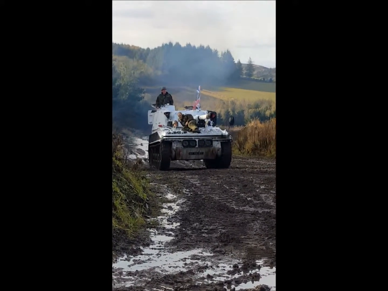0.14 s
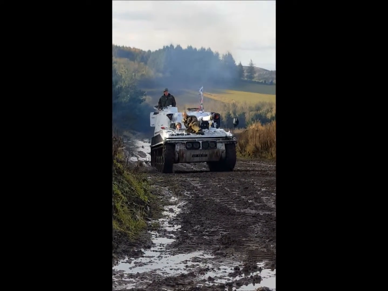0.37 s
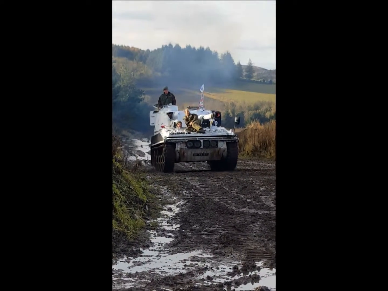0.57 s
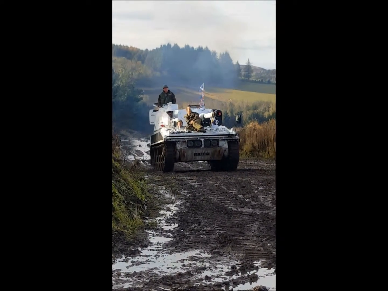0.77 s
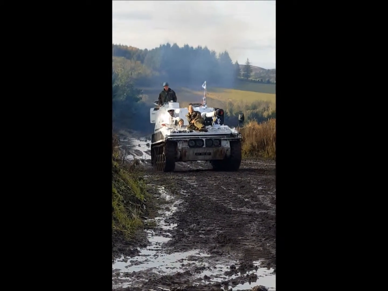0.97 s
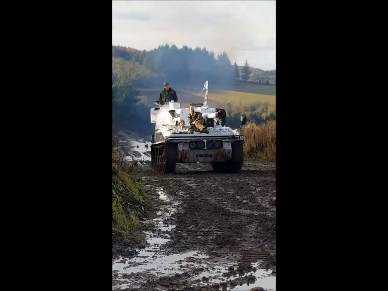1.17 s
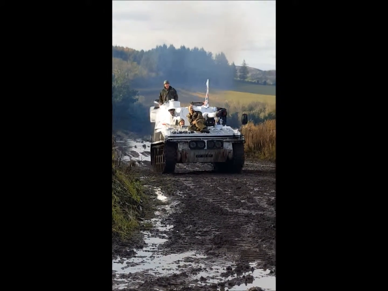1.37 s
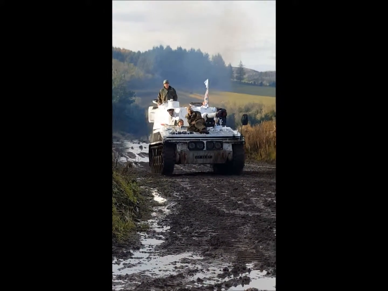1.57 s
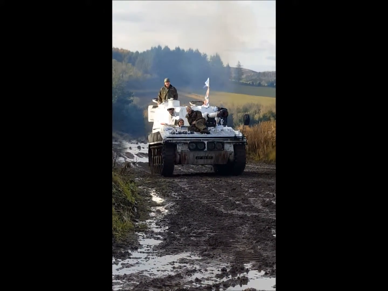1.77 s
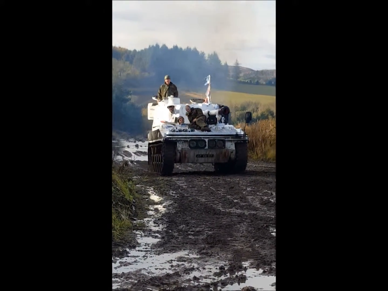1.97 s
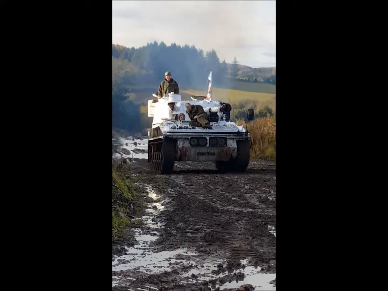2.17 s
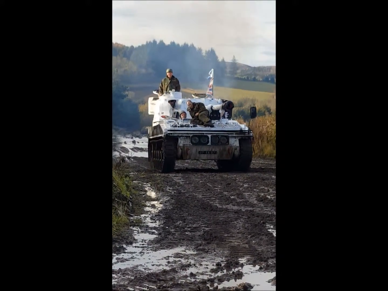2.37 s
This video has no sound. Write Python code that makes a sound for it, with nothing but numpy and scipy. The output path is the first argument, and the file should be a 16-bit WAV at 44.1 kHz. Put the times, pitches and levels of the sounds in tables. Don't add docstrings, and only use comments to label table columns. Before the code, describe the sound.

A heavy tracked vehicle's engine drones and roars steadily closer, its tracks ticking, clanking and squeaking

```python
import sys
import numpy as np
from scipy import signal
from scipy.fft import rfft, irfft, next_fast_len
from scipy.io import wavfile
from scipy.ndimage import uniform_filter1d

SR = 44100
rng = np.random.default_rng(int(sys.argv[2]) if len(sys.argv) > 2 else 0)


def voltage_ratio(level):
    return 10 ** (np.asarray(level, float) / 20)


def to_wav(s):
    ch = np.atleast_2d(s).T
    pcm = np.round(np.clip(ch, -1, 1) * 32767)
    wavfile.write(sys.argv[1], SR, pcm.astype(np.int16))


N = 111573
FAST = next_fast_len(N)
FREQ_HZ = np.maximum(np.fft.rfftfreq(FAST, 1 / SR), 1)
LEFT_RIGHT = np.array([[.5], [-.5]])
CYLINDERS = 6


def level(x, db):
    return x * voltage_ratio(db) / np.sqrt(np.mean(x ** 2))


def curve(table, t, col):
    rows = np.array(table, float)
    return np.interp(t, rows[:, 0], rows[:, col])


def log_curve(table, hz):
    rows = np.array(table, float)
    return np.interp(np.log(hz), np.log(rows[:, 0]), rows[:, 1])


def walk(rate_hz):
    k = max(int(SR / rate_hz) // 32, 1)
    steps = np.repeat(rng.standard_normal(N // 32 // k + 2), k)
    steps = uniform_filter1d(uniform_filter1d(steps, k), k)
    return 1.3 * np.interp(np.arange(N) / 32, np.arange(len(steps)), steps)


def hiss(count):
    return rfft(rng.standard_normal((count, FAST)))


def band(spectrum, hz, width_oct):
    bell = np.exp(-.5 * (np.log2(FREQ_HZ / hz) / width_oct) ** 2)
    return irfft(spectrum * bell, FAST)[..., :N]


# (time [s], firing rate [Hz])
SPEED = [(0, 136.9), (.5, 136.7), (1.0, 136.2), (1.4, 135.75), (1.8, 136.05), (2.1, 136.5), (2.53, 137)]


def engine_cycle(t):
    cycle_start = .3
    return 2 * np.pi * (np.cumsum(curve(SPEED, t, 1)) / SR / CYLINDERS - cycle_start)


# (time [s], firing note [dB], uneven-cylinder throb [dB])
EFFORT = [(0.0, -21.5, -23.5), (0.08, -13, -22), (0.2, -13.5, -21.5), (0.43, -19, -23.5),
          (0.56, -15.5, -20.5), (1.16, -17, -21), (1.21, -18, -19.5), (1.64, -12, -21),
          (1.82, -14.5, -20.5), (2.2, -13, -20), (2.53, -15, -18)]
# (multiple of the cycle rate [1], level [dB])
EXHAUST = [(2, -41.5), (3, -28.5), (4, -32), (5, -51), (6, 0), (7, -24.5), (8, -15.5), (9, -11.5),
           (10, -12), (11, -27.5), (12, -11), (13, -25.5), (14, -23.5), (15, -23), (16, -23), (17, -27.5),
           (18, -27), (19, -33.5), (20, -45), (21, -31.5), (23, -47.5)]
# (time [s], level [dB])
OCTAVE = [(0, 1.5), (.25, -4), (.7, 0), (1.05, 1), (1.35, -2), (1.6, 1), (2.53, -0.5)]


def exhaust(t, cycle):
    dispersion_rad, smear_rad, wander_db = 1.6, .008, .8
    out = 0
    for k, db in EXHAUST:
        wander, slip = walk(7.04), walk(12)
        if k == CYLINDERS:
            gain_db = curve(EFFORT, t, 1) + .3 * wander
        else:
            throb_db = (curve(EFFORT, t, 2) + 20) * min(k / 9, 1.5) - 14
            gain_db = throb_db + db + wander_db * wander * min((k / 10) ** 2, 3)
        if k == 2 * CYLINDERS:
            gain_db = gain_db + curve(OCTAVE, t, 1)
        phase = k * cycle - dispersion_rad * k * k / 2 + smear_rad * k * k / 6 * slip
        out = out - np.sqrt(2) * voltage_ratio(gain_db) * np.sin(phase)
    return out


MESH = [27, 34, 45, 52, 60, 70, 75, 82, 150, 164.3, 249.5, 301]
# (level [dB], smear [rad], flutter [dB])
WHINES = [(-48, .4, 2), (-46, .5, 2), (-52, .5, 2), (-50, .6, 2), (-41, .4, 1.5), (-51, .8, 2),
          (-50, .7, 2), (-49, 1.3, 2.5), (-49.5, .7, 2), (-54, 1.3, 2), (-66, .7, 2), (-70, 1.3, 2)]


def whines(t, cycle):
    beat_depth = .5
    out = 0
    for teeth, (db, smear_rad, flutter_db) in zip(MESH, WHINES):
        gain = voltage_ratio(db + flutter_db * walk(30)) * (1 + beat_depth * np.cos(cycle + teeth))
        out = out + gain * np.sin(teeth * cycle + smear_rad * walk(25))
    return np.sqrt(2) * out


# (time [s], frequency [Hz])
FINAL_DRIVE = [(0, 1117), (.9, 1112), (1.6, 1105), (2.53, 1104)]


def final_drive(t):
    gain = voltage_ratio(-38 + 0.98 * walk(18))
    phase = 2 * np.pi * np.cumsum(curve(FINAL_DRIVE, t, 1)) / SR
    return np.sqrt(2) * gain * np.sin(phase + .6 * walk(10))


# (frequency [Hz], density [dB per Hz])
ROAR = [(40, -9), (90, -5.5), (330, -2.5), (560, -14.5), (1500, -15), (4200, -30), (9800, -44.5),
        (15000, -47.5)]
# (frequency [Hz], width [Hz], lift [dB])
HULL = [(362, 22, 3.5), (734, 203, 6), (970, 240, -1.5), (1190, 270, 3), (1418, 360, 4.5), (1842, 94, 8),
        (2300, 91, 4.5), (2464, 300, -5.5), (2930, 270, 1), (3630, 610, 6.5), (5780, 1100, 1.5),
        (6550, 370, -1.5), (8800, 1030, 6)]
# (frequency [Hz], likeness of left and right [0-1])
ALIKE = [(100, 1), (300, 0.91), (640, 0.84), (1400, 0.89), (3000, 0.89), (6700, 0.51), (14000, 0.6)]


def roar(cycle):
    roar_db, puff_depth, swell_db, sway_db = -26.5, 0.091, .5, .7
    db = log_curve(ROAR, FREQ_HZ) - 40 * np.log10(np.maximum(40 / FREQ_HZ, 1))
    for hz, width_hz, lift_db in HULL:
        db = db + lift_db * np.exp(-np.abs(2 * (FREQ_HZ - hz) / width_hz) ** 3)
    noise = hiss(count=3) * voltage_ratio(db)
    out, swell = 0, walk(2.36)
    for hz in 40 * 2 ** np.arange(0, 9, .7):
        alike = np.clip(curve(ALIKE, hz, 1), 0, 1)
        split = np.sqrt([[alike], [1 - alike], [1 - alike]])
        sway = voltage_ratio(swell_db * swell + sway_db * walk(6.34) + 0.38 * walk(20))
        puff = 1 + puff_depth * np.cos(cycle + np.log(hz))
        out = out + band(noise, hz, 0.54) * sway * puff * split
    out = out * voltage_ratio(roar_db) / np.sqrt(np.mean(out[0] ** 2 + out[1] ** 2))
    return out[0], out[1:]


def link_ticks():
    links_per_s, link_db, spread_db, tail_s = 200, -60, 2.6, 0.0013
    chance = rng.random((int(links_per_s * 2.6), 2))
    clicks = np.zeros(N)
    clicks[(chance[:, 0] * N).astype(int)] = voltage_ratio(-spread_db * np.log(chance[:, 1] + 1e-4))
    tails = signal.lfilter([1], [1, -np.exp(-1 / (tail_s * SR))], clicks) * rng.standard_normal(N)
    return level(band(rfft(tails, FAST), 6000, 0.44), link_db)


# (time [s], level [dB], frequency [Hz])
KNOCKS = [
    (.187, -50, 10400),
    (.294, -47, 5280),
    (.641, -41, 7000),
    (1.04, -50, 8700),
    (1.155, -43, 8800),
    (1.443, -41, 6230),
    (2.128, -48, 6200),
    (2.175, -34, 520),
    (2.181, -35, 800),
    (2.26, -48, 10000),
]


def link_knocks(t):
    out = 0
    for s, db, hz in KNOCKS:
        grit = level(band(hiss(count=1)[0], hz, 0.52), db - 4)
        out = out + grit * (t > s) * np.exp(-np.abs(t - s) / (0.0044 + 8 / hz))
    return out


# (time [s], length [s], frequency [Hz], level [dB])
SQUEAKS = [
    (2.212, .028, 12220, -59),
    (2.232, .036, 12445, -49),
    (2.277, .013, 11850, -55),
    (2.288, .014, 12700, -55),
    (2.27, .15, 742, -37),
    (2.33, .09, 3510, -49),
    (2.08, .32, 3425, -50),
    (2.38, .04, 1370, -37),
    (2.172, .05, 440, -32),
]


def pin_squeaks(t):
    out = 0
    for s, length_s, hz, db in SQUEAKS:
        shape = np.sin(np.pi * np.clip((t - s) / length_s, 0, 1)) ** .6 * voltage_ratio(2.5 * walk(90))
        wobbly_t = t + np.cumsum(0.00476 * walk(120)) / SR
        out = out + np.sqrt(2) * voltage_ratio(db) * shape * np.sin(2 * np.pi * hz * wobbly_t)
    return out


# (time [s], length [s], level [dB], left-right [dB])
GUSTS = [(0.307, 0.094, -25.5, 2), (0.397, 0.062, -30, -14), (0.58, 0.12, -32, 7), (0.857, .06, -32, -2),
         (1.112, .06, -28, -8), (1.447, 0.099, -28, 2), (1.687, 0.27, -33, -8), (1.854, 0.11, -33, -5),
         (2.052, 0.08, -23.5, 5), (2.213, 0.12, -25.5, 7.5), (2.27, 0.044, -21, -11),
         (2.504, 0.1, -26.5, -4.5)]


def wind(t):
    wind_db, wind_hz = -39, 94
    gain = voltage_ratio(wind_db + 2.5 * np.array([walk(15), walk(15)]))
    for s, length_s, db, pan_db in GUSTS:
        puff = np.exp(-.5 * ((t - s) / (length_s / 3.5)) ** 2)
        gain = gain + voltage_ratio(db + pan_db * LEFT_RIGHT) * puff
    noise = hiss(count=3)
    return level(band(noise[1:] + 0.69 * noise[0], wind_hz, 0.63), 0) * gain


# (direct lag [s], echo lag [s], echo gain [1])
PORTS = [(.00002, 0.0004, 0.34), (.00003, .0007, 0.32)]
# (frequency [Hz], left-right [dB])
SHADE = [(130, 0.65), (260, -3), (520, 0.5), (1000, 2.4), (2000, 1), (4000, -5.5), (8000, -0.7), (12000, 1)]


def at_ports(direct):
    echo_top_hz = 10000
    w = 2j * np.pi * FREQ_HZ
    paths = []
    for lag_s, echo_s, echo_gain in PORTS:
        straight = np.exp(-w * lag_s / (1 + (FREQ_HZ / echo_top_hz) ** 4))
        echo = echo_gain * np.exp(-w * echo_s - (FREQ_HZ / echo_top_hz) ** 2)
        paths.append((straight + echo) / (1 + echo_gain))
    shade = voltage_ratio(log_curve(SHADE, FREQ_HZ) * LEFT_RIGHT)
    return irfft(rfft(direct, FAST) * np.array(paths) * shade, FAST)[:, :N]


def scene():
    approach_db_per_s = 1.08
    t = np.arange(N) / SR
    cycle = engine_cycle(t)
    near = voltage_ratio(approach_db_per_s * (t + 0.3))
    shared, scattered = roar(cycle)
    track = link_ticks() + link_knocks(t) + pin_squeaks(t)
    direct = exhaust(t, cycle) + near * (whines(t, cycle) + final_drive(t) + shared + track)
    return at_ports(direct) + near * scattered + wind(t)


def roll_off(x):
    return signal.sosfilt(signal.butter(12, 15400, fs=SR, output="sos"), x)


def record(dry):
    top_hz = 14950
    rounded = np.tanh(0.95 * dry) / 0.85
    soft = signal.sosfilt(signal.butter(10, top_hz, fs=SR, output="sos"), rounded)
    return roll_off(soft)


dry = scene()
out = record(dry)
to_wav(out)
```